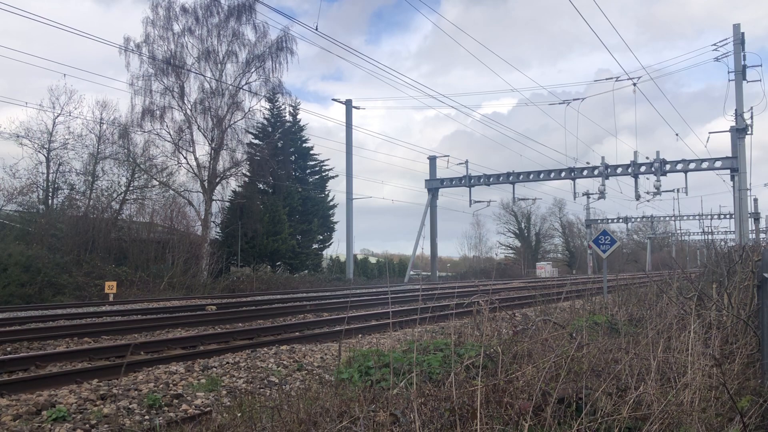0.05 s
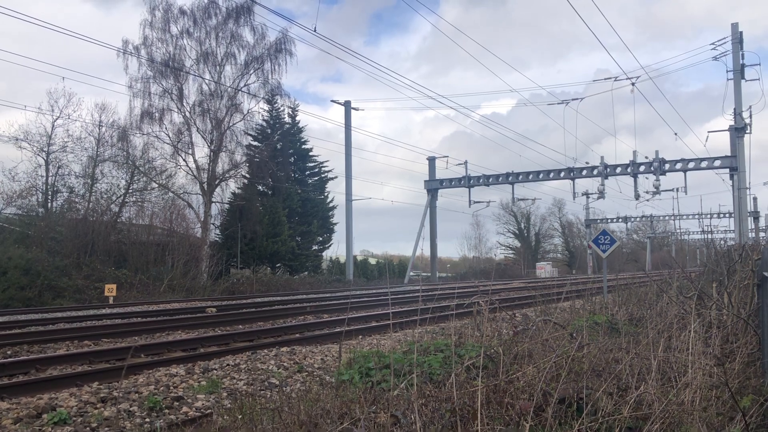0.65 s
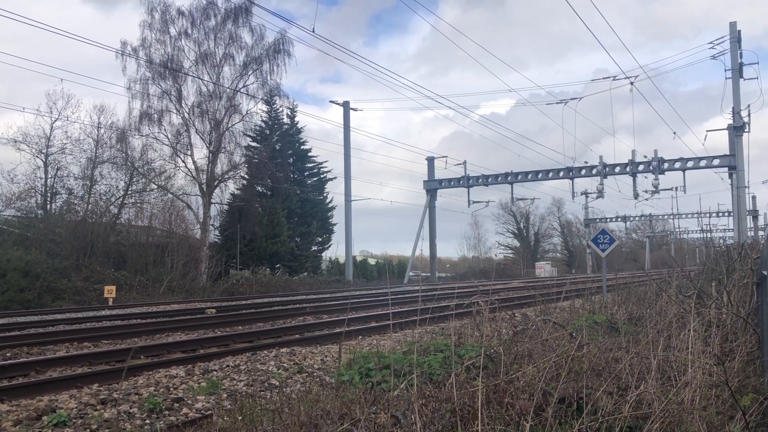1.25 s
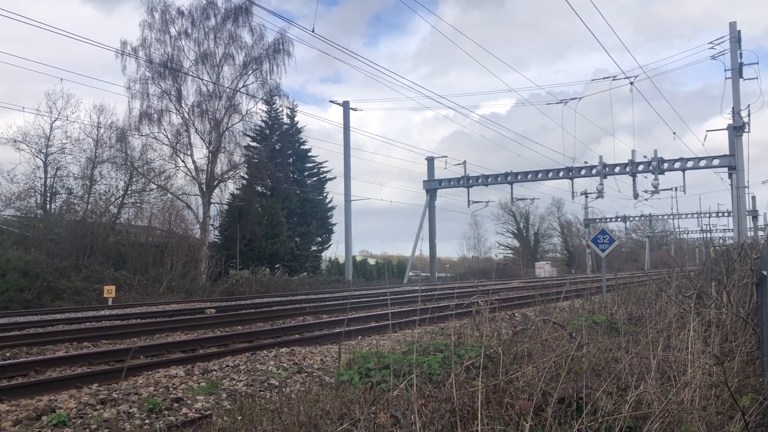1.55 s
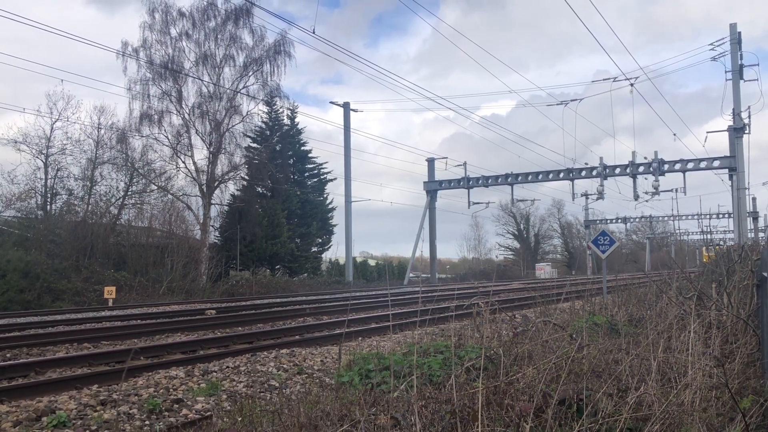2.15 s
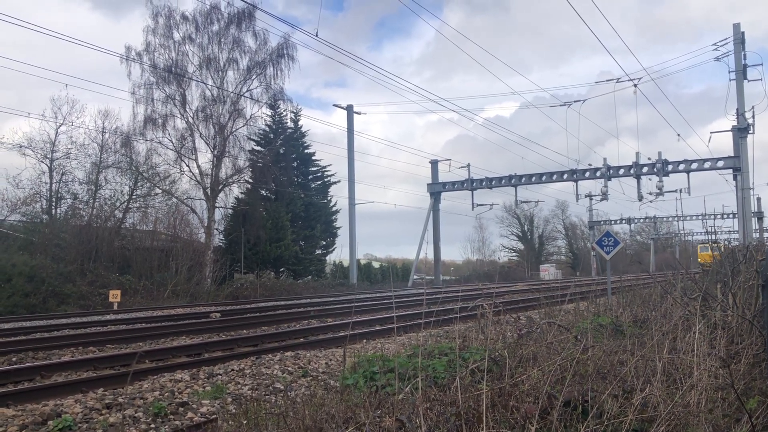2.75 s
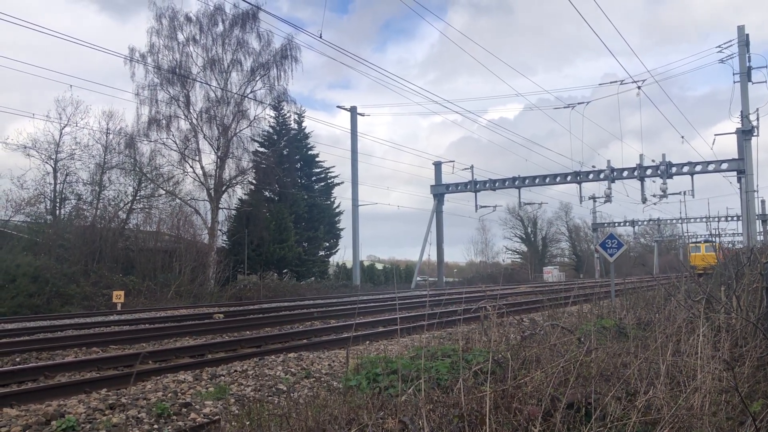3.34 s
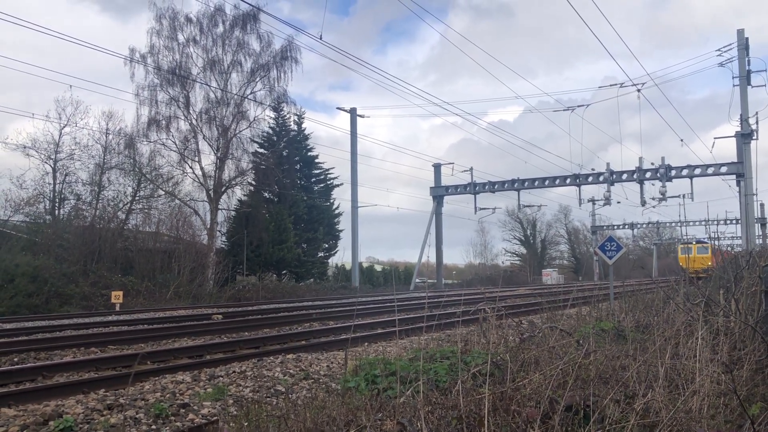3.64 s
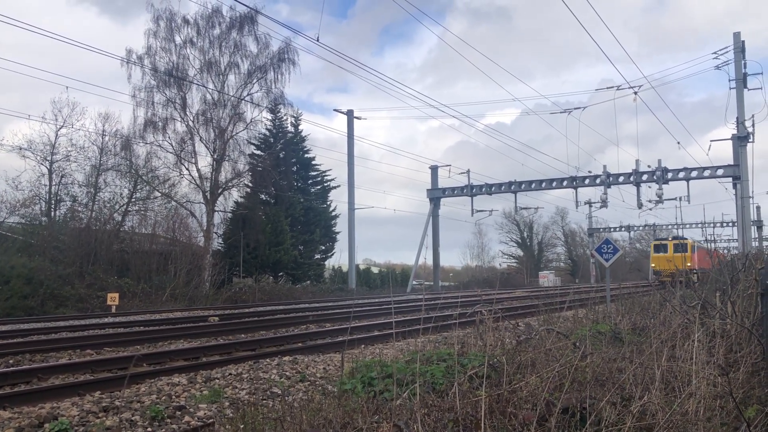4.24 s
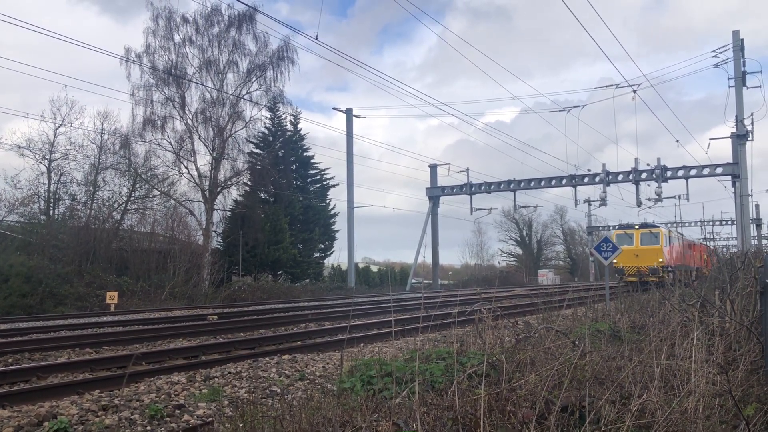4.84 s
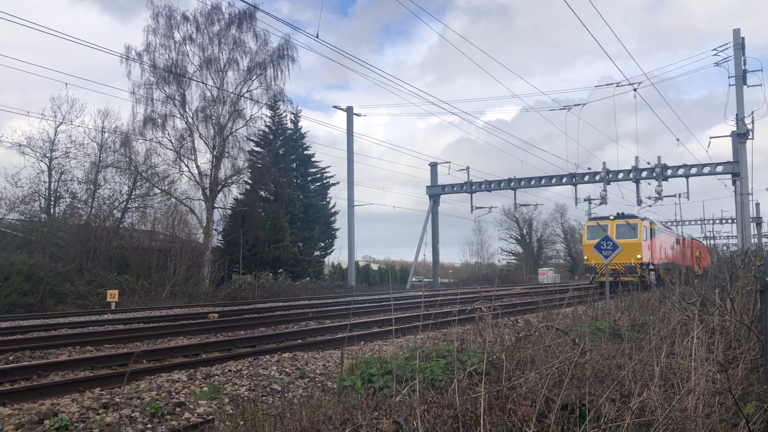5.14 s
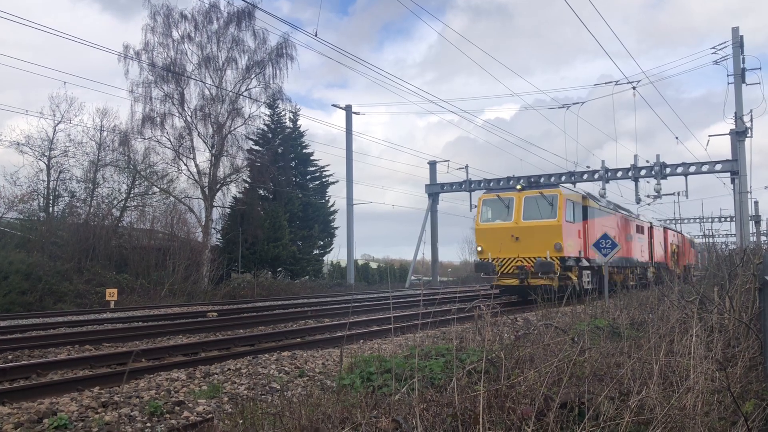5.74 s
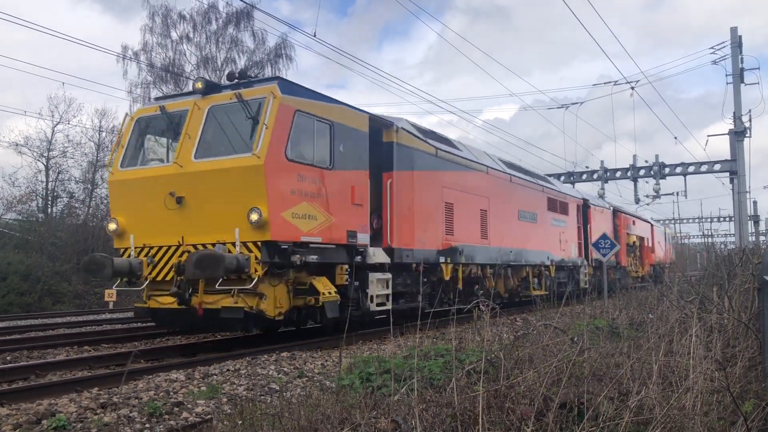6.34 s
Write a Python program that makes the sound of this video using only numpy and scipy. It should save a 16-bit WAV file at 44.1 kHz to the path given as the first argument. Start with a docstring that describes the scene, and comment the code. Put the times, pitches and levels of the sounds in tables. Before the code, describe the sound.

Beside an open railway line, low wind buffets thump on the microphone, strongest in the first second and a half, over a continuing breeze. A distant bird gives a few thin, faint chirps in the first second. The rails carry a very high hiss with flaring whistles, stepping up around 1 and 2 seconds as a diesel maintenance train approaches. From about 0.5 seconds its wheels ring with a metallic tone, surging roughly twice a second with a fast judder. The breeze freshens around 3 seconds while the rolling rumble and rush keep growing. At about 5.5 seconds the engine drone comes forward, sinking slightly in pitch. Just after 6 seconds the drone, ringing wheels and rolling roar are loudest, with a few brief spurts of hiss. The train is nearly alongside when the sound ends at about 6.5 seconds.

```python
"""Maintenance train approaching

A diesel track maintenance train draws up to a microphone beside the line on a breezy day.
The steel rails hiss and whistle ahead of it. Rough rail rings its wheels in surges, and uneven
treads make them judder with every turn. At the end, engine drone and rolling roar take over.
Wind buffets the microphone, and a far bird chirps early on."""
import sys
import numpy as np
from scipy import signal
from scipy.fft import irfft, next_fast_len
from scipy.io import wavfile

SR = 44100
rng = np.random.default_rng(int(sys.argv[2]) if len(sys.argv) > 2 else 0)


def digitize_waveform(pressure):
    """Quantize a signal to 16-bit integers and store it at the path in sys.argv[1].

    Rows of a 2-D input are taken as channels; values are limited to [-1, 1].
    """
    field = np.atleast_2d(pressure).T
    bounded = np.clip(field, -1, 1)
    quanta = np.round(bounded * 32767).astype(np.int16)
    wavfile.write(sys.argv[1], SR, quanta)


N = 286209
FFT_SIZE = next_fast_len(N, real=True)
T, HZ = np.arange(N) / SR, np.fft.rfftfreq(FFT_SIZE, 1 / SR)
SPEED_M_PER_S, PASS_S, TURNS_PER_S = 20, 6.7, 7.95  # the front would draw level at PASS_S

# colour of the open air: frequency_hz, level_db
AIR_COLOUR = [(20, -7), (35, 10.5), (150, 2.5), (350, -2.5), (600, -3.5), (1200, -2), (2000, -14),
              (4000, -20), (6000, -31.5), (8500, -36), (16000, -41)]
# colour of the breeze on the microphone: frequency_hz, level_db
BREEZE_COLOUR = [(20, -60), (29, -23), (38, -5), (60, 2), (110, 1.5), (160, -5.5), (230, -16), (350, -24),
                 (1000, -76), (3000, -100)]
# colour of a wind buffet: frequency_hz, level_db
BUFFET_COLOUR = [(25, -30), (55, -1), (110, 0), (190, -5), (280, -10), (400, -23), (900, -55), (3000, -100)]
# wind buffets: peak_s, level_db, length_s
WIND_BUFFETS = [(0.076, -46, 0.026), (.18, -39, 0.028), (0.252, -35, 0.028), (0.376, -37, 0.068),
                (0.45, -34, 0.027), (0.542, -31, 0.069), (0.64, -33, 0.065), (0.896, -40.5, 0.044),
                (1.087, -36, 0.048), (1.183, -42, 0.047), (1.472, -31, 0.024), (1.986, -40.5, 0.025),
                (2.07, -39, .05), (2.19, -42, 0.042), (2.866, -42.5, 0.061), (3.156, -37, 0.036),
                (3.407, -33.5, 0.034), (3.537, -34.5, .04), (3.895, -41.5, .08), (4.59, -36, .04)]
# bird notes: start_s, length_s, start_hz, end_hz, level_db
BIRD_NOTES = [(.06, .11, 3500, 3490, -66), (.27, .07, 4200, 4220, -73), (.35, .09, 4800, 4520, -70),
              (.4, .08, 3500, 3500, -70), (.6, .09, 3520, 3480, -69), (.89, .1, 4770, 4520, -69)]
# crossfade from the far train (0) to the near one (1): time_s, nearness
TRAIN_NEARNESS = [(0, 0.055), (1.3, 0.16), (2.5, 0.45), (4.8, 0.81), (6.49, 0.99)]
# how squarely the front bogie faces the microphone, 0 to 1: time_s, facing
BOGIE_FACING = [(5.2, 0.17), (6.0, 0.23), (6.11, 0.4), (6.16, 1), (6.49, 0.82)]
# pitch bend of the engine drone: time_s, pitch_hz
DRONE_BEND = [(0, 330.5), (5.0, 327.6), (5.8, 328), (6.2, 326.3), (6.49, 325.4)]
# fader of the engine drone: time_s, level_db
DRONE_FADER = [(0, -66), (2.5, -56), (4.0, -54), (4.8, -46.5), (5.3, -41.5), (5.5, -32.5), (5.85, -33),
               (6.1, -30), (6.25, -23.5), (6.49, -30.5)]
# engine and fan tones: starting_pitch_hz, level_db
DRONE_TONES = [(111.6, -10), (187, -14), (225, -7), (286, -13), (328, 2), (627, -7.5), (858, -6),
               (952, -6.5), (1448, -36)]
# colour of the running gear's rumble: frequency_hz, level_db
RUMBLE_COLOUR = [(25, -45), (40, 1), (70, -6), (120, 2.5), (185, -4), (260, -6.5), (330, -1), (470, 1.5),
                 (560, -1), (760, 0.5), (1100, -15), (2200, -19), (5000, -39.5)]
# underframe resonances: pitch_hz, width_hz, ahead_db, alongside_db
FRAME_MODES = [(190, 68, -9, 9), (270, 68, -5, 5), (335, 20, 4.5, 4.5), (393, 25, 7, 4.5),
               (456, 33, -4, 2.5), (511, 57, 4.5, -6)]
# brief swells of the running gear: peak_s, rise_db, length_s
GEAR_SWELLS = [(3.76, 4, 0.18), (4.1, 3.5, 0.13), (4.6, 1, 0.15), (5.16, 3.5, 0.25), (5.75, 3.5, 0.11),
               (6.2, 0, .12)]
# rolling rush, dulled by the air at a distance: frequency_hz, far_db, near_db
RUSH_COLOUR = [(400, -5, -31), (900, 6, 9), (1270, 0, 7), (1590, 12.5, 5.5), (2300, 6.5, 0.5),
               (2850, 5.5, 2.5), (3170, -5, -2.5), (4180, -17, -2), (5000, -22, -7), (6950, -16, -7.5),
               (9900, -35, -11), (16000, -30, -29)]
# wheel rings heard only close by: pitch_hz, width_hz, level_db
CLOSE_WHEEL_MODES = [(943, 83, 18.5), (1280, 79, 16.5), (1490, 45, 13), (1590, 81, 8), (2160, 79, 5),
                     (2620, 38, -7), (2950, 46, -4), (3650, 83, 5.5), (5800, 680, -5.5)]
# spurts of hiss along the rails: peak_s, level_db, length_s, centre_hz, width_hz
HISS_SPURTS = [(0.38, -60, 0.022, 14500, 4340), (0.437, -63.5, .04, 14000, 5000),
               (.525, -61.5, 0.033, 14000, 5000), (.69, -60, .09, 14500, 4000),
               (.74, -70, 0.18, 6960, 7000), (2.207, -63.5, 0.15, 5100, 1300),
               (2.188, -67, 0.12, 8500, 5000), (6.19, -37, 0.014, 9500, 9000),
               (6.31, -36, .02, 11000, 8000), (6.38, -31, 0.0087, 13000, 7000)]
# hiss travelling in the rail: frequency_hz, far_db, near_db
HISS_COLOUR = [(3000, -42, -40), (6050, -31, -17), (7160, -19, -8), (8050, -63, -14.5), (9200, -27, -2),
               (10670, -5, -6.5), (11300, 2.5, 2), (13000, 6, 2.5), (13400, 0, -3), (14200, 8.5, 4),
               (15240, 8, 0.5), (15750, 0, -11)]
# rail resonances: pitch_hz, above_hiss_db
RAIL_RESONANCES = [(7350, 2), (8530, 5), (8820, 13), (9130, 8), (9430, 10), (9745, 12), (10030, 6),
                   (10350, 8), (10940, 9), (11230, 6), (11555, 12), (11860, 5), (12200, 2), (12470, 10),
                   (12750, 8), (13050, 8), (13660, 4), (14280, 7), (14580, 5), (15000, 1), (15200, 6),
                   (15480, 5)]
# the hiss steps up as the train runs onto nearer lengths of rail: middle_s, rise_db, length_s
RAIL_STEPS = [(.95, 4.7, .2), (2.06, 6.2, .3)]
# the rail's whistling cluster: pitch_hz, width_hz, level_db
WHISTLE_CLUSTER = [(6705, 35, 0), (6797, 45, -1), (6930, 60, -3), (7015, 50, -3), (6820, 700, -15)]
# flares of the rail's whistle: peak_s, rise_db, length_s
WHISTLE_FLARES = [(.53, 10, 0.18), (.75, 7, .12), (1.38, 4.5, .14), (1.65, 1, .12), (2.0, 2, .15),
                  (2.36, 5, 0.11), (2.75, 3.5, .16), (4.33, 8, 0.14), (4.86, 6, .14), (5.44, 7, 0.15),
                  (5.85, 4, .15), (6.18, 9, 0.12)]
# judder of the uneven treads: multiple_of_turning_rate, depth
TREAD_HARMONICS = [(2, 0.26), (3, 0.075), (4, 0.048), (5, 0.08), (6, 0.051), (8, 0.077), (9, 0.12),
                   (15, 0.056)]
# broad body of wheels and sleepers: frequency_hz, far_db, near_db
WHEEL_BODY = [(200, -27, -36), (523, -28, -37), (793, -4, -15), (1140, -11.5, -13), (1590, -14, -22),
              (1680, -15, -36), (1960, -33, -27), (2240, -47, -54), (5000, -70, -70)]
# wheel resonances: pitch_hz, width_hz, far_db, near_db
WHEEL_RESONANCES = [(627, 61, -2, 0), (705, 89, 0, -5), (976.5, 75, -1.5, 3.5), (998, 43, -7, -3),
                    (1072, 58, 1.5, -3), (1303, 66, 2, -12), (1430, 41, -11, -17), (1784, 26, -8.5, -9),
                    (1894, 103, -10, -7.5), (1936, 108, -15, -10)]
# rough stretches of rail, about two a second, make the wheels surge: peak_s, rise_db, length_s
WHEEL_SURGES = [(.66, 6, .15), (1.35, 4.5, 0.15), (1.96, 5.5, 0.1), (2.45, 6, 0.17), (3.0, 7, 0.14),
                (3.57, 8, 0.2), (4.19, 7.6, 0.22), (4.57, 8.5, 0.15), (5.0, 7, .07), (5.18, 7, 0.2),
                (5.47, 4, 0.069), (5.64, 8.5, 0.14), (6.165, 10.5, 0.065), (6.46, 7, .06)]


def amp(db):
    """Decibels to gain."""
    return 10 ** (np.asarray(db) / 20)


def curve(rows):
    """An envelope through (time_s, value) points."""
    return np.interp(T, *np.transpose(rows))


def shape(rows):
    """An EQ curve for each level column of a colour table."""
    hz, *columns = np.transpose(rows)
    return np.array([amp(np.interp(np.log(HZ + 1), np.log(hz), db)) for db in columns])


def ringing(modes):
    """An EQ curve of steep resonances for each level column."""
    peaks = (amp(db)[:, None] / (1 + (1.98 * (HZ - hz) / width) ** 2) for hz, width, *db in modes)
    return np.sqrt(sum(peak ** 2 for peak in peaks))


def noise(colours, band_hz=(0, SR)):
    """One noise played through each EQ curve, each with rms 1 inside the band."""
    spectra = colours * (rng.standard_normal(len(HZ)) + 1j * rng.standard_normal(len(HZ)))
    in_band = (HZ >= band_hz[0]) & (HZ <= band_hz[1])
    power = 2 * np.sum(abs(spectra[:, in_band]) ** 2, axis=1, keepdims=True)
    return irfft(spectra * FFT_SIZE / np.sqrt(power), FFT_SIZE)[:, :N]


def drift(rate_hz):
    """A random wander of rms 1, up to about the given rate."""
    return noise(1 / (1 + (HZ[None] / rate_hz) ** 4))[0]


def tremolo(motion, depth):
    """A gain of rms 1 that rides the given motion."""
    gain = np.exp(depth * motion)
    return gain / np.sqrt(np.mean(gain ** 2))


def swell(peak_s, length_s):
    """A smooth bump of height 1."""
    return np.exp(-2 * ((T - peak_s) / length_s) ** 2)


def swells_db(rows):
    """A fader ride made of smooth bumps."""
    return sum(db * swell(peak_s, length_s) for peak_s, db, length_s in rows)


def rise(middle_s, rise_db, length_s):
    """A fader move that starts rise_db down and climbs smoothly to 0 dB."""
    return rise_db * (np.tanh(2 * (T - middle_s) / length_s) - 1) / 2


def approach(far, near):
    """Crossfade from far to near as the train comes on."""
    nearness = curve(TRAIN_NEARNESS)
    return (1 - nearness) * far + nearness * near


def alongside():
    """Climbs towards 1 as the first bogie draws level."""
    return curve(BOGIE_FACING)


def to_go_m():
    """Track left between the train and the microphone."""
    return SPEED_M_PER_S * (PASS_S - T)


def airborne_db(base_db, doubling_db, closest_m, facing_db):
    """Sound in air falls with each doubling of distance, and lifts as the train clears a grassy bank."""
    doublings = np.log2(np.hypot(to_go_m(), closest_m) / 20)
    bank_db = rise(middle_s=5.7, rise_db=1.96, length_s=0.24)
    return base_db - doubling_db * doublings + bank_db + facing_db * alongside()


def wind(breeze_db=-39.5, air_db=-51):
    """Lumpy turbulence on the microphone and brighter buffets, over a bed of open air."""
    freshening_db = rise(middle_s=3.25, rise_db=5.6, length_s=0.33)
    breeze = amp(breeze_db + freshening_db) * noise(shape(BREEZE_COLOUR))[0]
    breeze *= tremolo(drift(4.7), depth=0.25)
    gusts = sum(amp(db) * swell(peak_s, length_s) for peak_s, db, length_s in WIND_BUFFETS)
    buffets = gusts * noise(shape(BUFFET_COLOUR))[0]
    return breeze + buffets + amp(air_db) * noise(shape(AIR_COLOUR))[0]


def bird():
    """Thin far notes, level or falling, blurred by the trees."""
    notes = np.zeros(N)
    for start_s, length_s, start_hz, end_hz, db in BIRD_NOTES:
        pitch_hz = np.interp(T, [start_s, start_s + length_s], [start_hz, end_hz])
        phase = 2 * np.pi * np.cumsum(pitch_hz) / SR
        notes += amp(db) * swell(start_s + length_s / 2, length_s) * np.sin(phase)
    return notes * (0.35 + 0.8 * drift(90))


def engine(trim_db=-1):
    """Wavering engine and fan tones, whose pitch sinks as the train draws alongside."""
    pitch_hz = curve(DRONE_BEND)
    bend = pitch_hz / pitch_hz[0] * (1 + 0.0019 * drift(6.2))
    bent_time = np.cumsum(bend) / SR
    drone = np.zeros(N)
    for hz, db in DRONE_TONES:
        waver = tremolo(drift(7), depth=0.2)
        drone += amp(db) * waver * np.sin(2 * np.pi * (hz * bent_time + rng.random()))
    return amp(curve(DRONE_FADER) + trim_db) * drone


def rolling_roar(load):
    """The running gear rumbles and the rolling contact rushes, both carried through the air."""
    frame_colours = np.hypot(shape(RUMBLE_COLOUR), ringing(FRAME_MODES))
    frame_ahead, frame_beside = noise(frame_colours, band_hz=(350, 560))
    dull, bright = shape(RUSH_COLOUR)
    metallic = np.hypot(bright, ringing(CLOSE_WHEEL_MODES)[0])
    rush_far, rush_near, rush_ringing = noise(np.array([dull, bright, metallic]), band_hz=(2400, 4400))
    # underframe and wheel faces turn towards the microphone only at the last moment
    rumble = frame_ahead + alongside() * (frame_beside - frame_ahead)
    rush = approach(rush_far, rush_near + alongside() * (rush_ringing - rush_near))
    rumble_db = airborne_db(-30.2, doubling_db=9.5, closest_m=17.5, facing_db=1) + swells_db(GEAR_SWELLS)
    rush_db = airborne_db(-41, doubling_db=9.2, closest_m=8.5, facing_db=1.35)
    grit = tremolo(drift(110), depth=0.063)
    roar = amp(rumble_db) * rumble + amp(rush_db) * rush * grit
    return roar * tremolo(load, depth=0.2) * approach(amp(-4.5), amp(1.2))


def rail_spurts():
    """Short, soft-edged bursts of hiss along the rails."""
    return sum(amp(db) * swell(peak_s, length_s) * noise(ringing([(hz, width_hz, 0)]))[0]
               for peak_s, db, length_s, hz, width_hz in HISS_SPURTS)


def rail_song(load, base_db=-41, loss_db_per_m=0.171, whistle_db=-11, mode_width_hz=92):
    """High waves run far ahead in the steel; the lower ones arrive as the train nears."""
    bed = shape(HISS_COLOUR)
    peaks = ringing([(hz, mode_width_hz, db) for hz, db in RAIL_RESONANCES])
    colours = np.vstack([bed, bed * np.hypot(1, peaks)])
    smooth, singing = np.split(noise(colours, band_hz=(11200, 15400)), 2)
    # each wheel feeds the rail unevenly, so the resonances stand out and sink back
    singing_share = np.clip(1.07 + 0.2 * drift(4), 0, 1)
    hiss = approach(*(smooth + singing_share * (singing - smooth)))
    whistle = noise(ringing(WHISTLE_CLUSTER), band_hz=(6650, 7080))[0]
    # flares lift the hiss only a little; close by, hiss takes the place of the whistle
    flare_db = swells_db(WHISTLE_FLARES)
    hiss *= amp(0.16 * flare_db + 2 * alongside())
    whistle *= amp(whistle_db + flare_db - 8 * alongside())
    level_db = base_db - loss_db_per_m * to_go_m() + sum(rise(*step) for step in RAIL_STEPS)
    song = amp(level_db) * (hiss + whistle)
    return song * tremolo(load, depth=0.14) * tremolo(drift(90), depth=0.04)


def tread_judder():
    """Uneven treads load the rail in the same pattern on every turn of the wheels."""
    turns = TURNS_PER_S * T + 0.018 * drift(5.9)
    return sum(depth * np.cos(2 * np.pi * (k * turns + rng.random())) for k, depth in TREAD_HARMONICS)


def wheel_ring(load, base_db=-34, loss_db_per_m=0.1576, facing_db=4):
    """Rail roughness rings the wheels: louder as they near, in surges, and at each rough spot of tread."""
    colours = np.hypot(ringing(WHEEL_RESONANCES), shape(WHEEL_BODY))
    ring = approach(*noise(colours, band_hz=(900, 1120)))
    entrance_db = rise(middle_s=0.53, rise_db=3.3, length_s=0.069)
    level_db = base_db - loss_db_per_m * to_go_m() + facing_db * alongside() + entrance_db
    ring *= amp(level_db + swells_db(WHEEL_SURGES))
    return ring * tremolo(load, depth=0.54) * tremolo(drift(17), depth=0.11)


def scene():
    """Train, wind and bird in one mono mix on both channels."""
    load = tread_judder()  # shakes everything that the wheels excite
    train = wheel_ring(load) + rolling_roar(load) + rail_song(load) + engine() + rail_spurts()
    mono = train + wind() + bird()
    return np.array([mono, mono])


def record(dry, cutoff_hz=15740):
    """A moment of silence, a quick fade-in and a steep high cut."""
    fade_in = np.clip((T - 0.035) / 0.031, 0, 1)
    high_cut = signal.firwin(1023, cutoff_hz, window=("kaiser", 9), fs=SR)
    return signal.oaconvolve(dry * fade_in, high_cut[None], "same", axes=1)


dry = scene()
out = record(dry)
digitize_waveform(out)
```